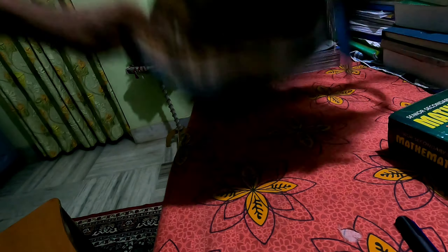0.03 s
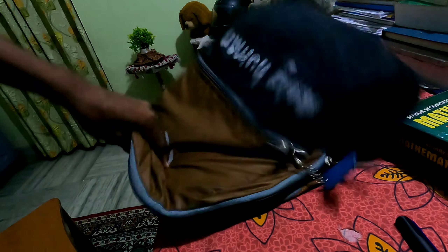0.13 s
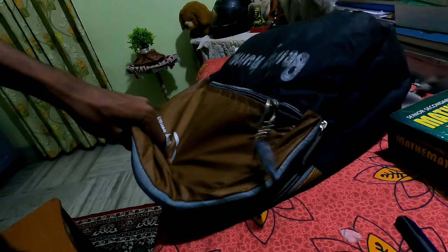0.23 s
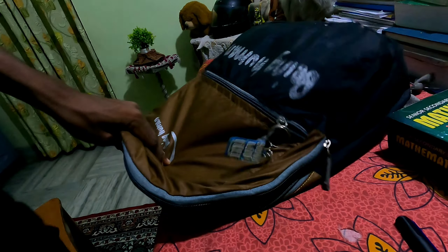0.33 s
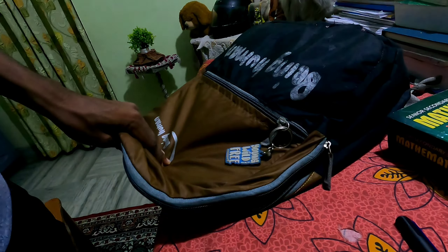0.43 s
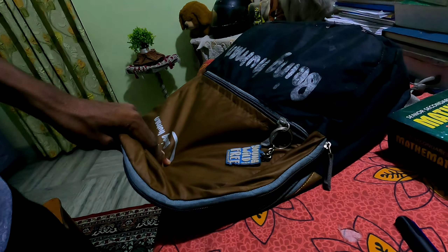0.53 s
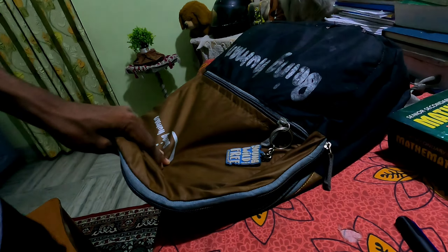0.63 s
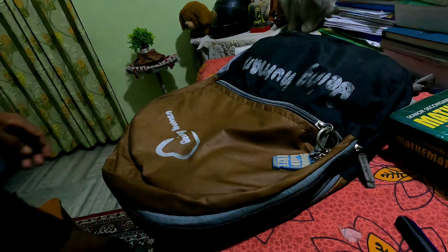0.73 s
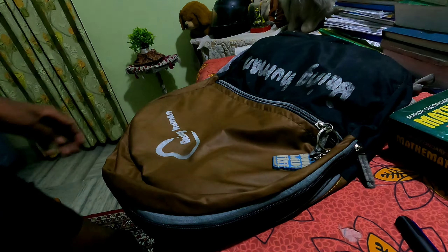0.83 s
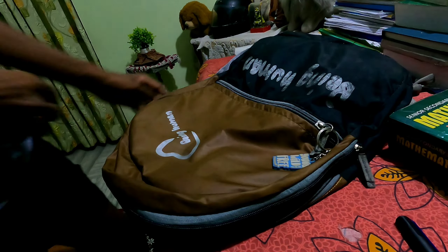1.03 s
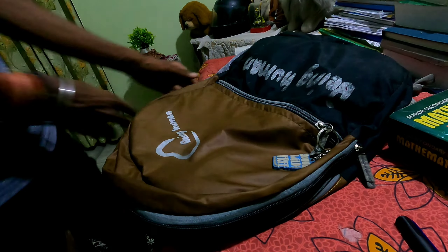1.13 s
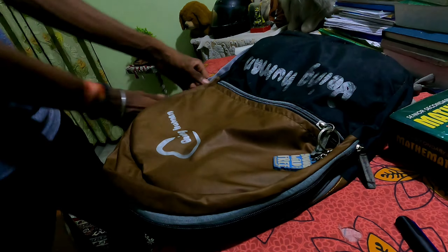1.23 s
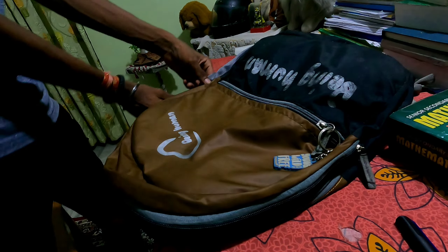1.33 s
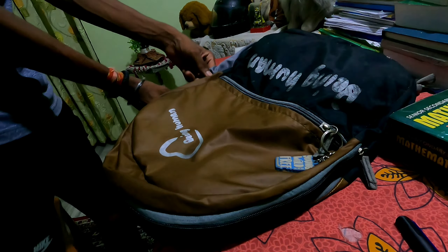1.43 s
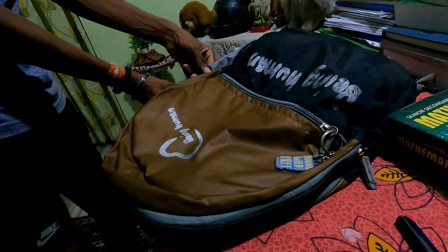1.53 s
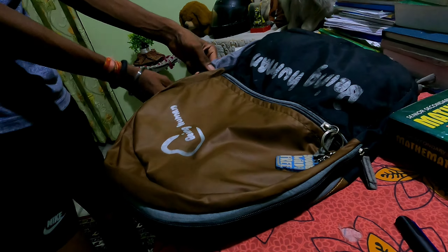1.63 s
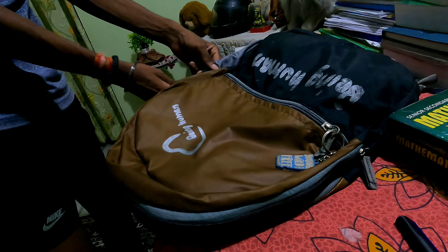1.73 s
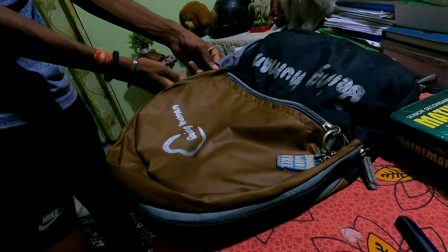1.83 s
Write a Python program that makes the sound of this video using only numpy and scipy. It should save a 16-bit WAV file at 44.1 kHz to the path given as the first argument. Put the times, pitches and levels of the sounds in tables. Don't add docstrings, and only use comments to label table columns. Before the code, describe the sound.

A packed backpack drops with a heavy soft thud on a bed, then hands rummage quietly

```python
import sys
import numpy as np
from scipy import signal
from scipy.fft import rfft, irfft
from scipy.io import wavfile

SR = 44100
rng = np.random.default_rng(int(sys.argv[2]) if len(sys.argv) > 2 else 0)


def level_to_linear(level):
    exponent = np.asarray(level, float) / 20
    return 10 ** exponent


def unload_wav(signal):
    wavfile.write(
        sys.argv[1],
        SR,
        np.round(np.clip(np.atleast_2d(signal).T, -1, 1) * 32767).astype(np.int16),
    )


N = 81585
TIME_S = np.arange(N) / SR


def in_time(rows):
    s, *columns = np.transpose(rows)
    return [np.interp(TIME_S, s, column) for column in columns]


def rms_one(x):
    return x / np.sqrt(np.mean(x ** 2) + 1e-20)


def drift(rate):
    pole = np.exp(-80 * np.pi * rate / SR)
    noise = rng.standard_normal(N // 40 + 2002)
    slow = signal.lfilter([1], [1, -2 * pole, pole * pole], noise)[2000:]
    return np.interp(np.arange(N) / 40, np.arange(len(slow)), rms_one(slow))


def band_pass(x, low_hz, high_hz):
    return signal.sosfilt(signal.butter(2, [low_hz, high_hz], "band", fs=SR, output="sos"), x)


def progress(start_s, length_s):
    return np.clip((TIME_S - start_s) / length_s, 0, 1)


def coloured(sources, spectrum, patchy_db):
    hz_points, db_points = np.transpose(spectrum)
    out, together = 0, drift(25)
    edges = 25 * 2 ** np.arange(0, 9.6, .5)
    for k, (low, high) in enumerate(zip(edges, edges[1:])):
        band = band_pass(sources[k % 2], low, high)
        log_centre = np.log(low * high) / 2
        level_db = np.interp(log_centre, np.log(hz_points), db_points, left=-60, right=-90)
        out = out + band * level_to_linear(level_db + patchy_db * (together + drift(12.0)))
    return rms_one(out)


def crumple(noise_share):
    grains_per_s, spread_db = 2700, 4.5
    sizes = level_to_linear(spread_db * np.minimum(rng.exponential(1, N), 5)) * rng.choice([-1, 1], N)
    grains = rms_one(sizes * (rng.random(N) < grains_per_s / SR))
    return grains + noise_share * rng.standard_normal((2, N))


# f/Hz, level per Hz/dB
HISS_SPECTRUM = [(710, -50), (1200, -2), (1580, -10), (1770, -20), (1890, -14.5), (6920, -7.5),
                 (11000, -18.5), (14300, -60), (22000, -120)]


def hiss():
    duck_s, recover_s, recover_length_s = .25, .78, 0.12
    held = (TIME_S > duck_s) * (1 - progress(recover_s, recover_length_s))
    level_db = -65.5 - 7 * held
    return level_to_linear(level_db) * coloured(rng.standard_normal((2, N)), HISS_SPECTRUM, patchy_db=-2.6)


# f/Hz, level per Hz/dB
ROOM_SPECTRUM = [(47, -18), (80, -3.5), (86, -2.5), (211, -7.5), (328, -29), (381, -21.5), (3000, -39),
                 (3900, -97), (6600, -120)]


def room():
    return level_to_linear(-52.5) * coloured(rng.standard_normal((2, N)), ROOM_SPECTRUM, patchy_db=-0.3)


# t/s, level/dB, low drag level/dB, crispness/dB
HANDS_BEFORE_CHANGE = [
    (0, -57, -48.5, 10),
    (.15, -53, -54, 7),
    (.2, -47, -47, 6.5),
    (.5, -56, -49, 8),
    (.6, -63.5, -55, -4.5),
    (.8, -59, -55, -23),
    (.9, -60, -51, 5),
    (1.0, -63.5, -56.5, 12.5),
]
# t/s, level/dB, low drag level/dB, crispness/dB
HANDS_AFTER_CHANGE = [(1.009, -53.5, -45, -26), (1.15, -51.5, -48, -22), (1.184, -52.5, -44, -1),
                      (1.25, -51.5, -49.5, -5), (1.3, -52, -42.5, 3.5), (1.35, -51.5, -52.5, 0),
                      (1.375, -50, -46.5, 0), (1.409, -48.5, -43, -0.5), (1.45, -56.5, -48.5, 4.5),
                      (1.498, -49, -45, -1), (1.57, -51.5, -51, -0.5), (1.63, -49.5, -50, -9),
                      (1.69, -54, -51, -6), (1.85, -55, -53, -12)]
# f/Hz, level per Hz/dB
CLOTH_SPECTRUM = [(290, -2), (500, -7), (565, -12), (923, -8.5), (1040, -1), (1130, -12), (1320, -9.5),
                  (6850, -29.5), (13000, -43)]
# f/Hz, level per Hz/dB
DRAG_SPECTRUM = [(15, -48), (25, -15), (184, 2), (243, -0.5), (316, -1), (467, -16.5), (530, -5),
                 (700, -14), (910, -47), (1540, -120)]


def hands():
    cloth_db, drag_db, crisp_db = in_time(list(HANDS_BEFORE_CHANGE) + list(HANDS_AFTER_CHANGE))
    crisp_hz = 4200
    x = coloured(crumple(2.1), CLOTH_SPECTRUM, patchy_db=0.42)
    dull = signal.lfilter(*signal.butter(2, crisp_hz, fs=SR), x)
    crisp = signal.lfilter(*signal.butter(2, crisp_hz, "high", fs=SR), x)
    cloth = level_to_linear(cloth_db) * (dull - level_to_linear(crisp_db) * crisp)
    drag = level_to_linear(drag_db) * coloured(rng.standard_normal((2, N)), DRAG_SPECTRUM, patchy_db=0.5)
    return cloth + drag


# t/s, length/s, level/dB, f/Hz
SPRING_SWAYS = [(.01, 0.15, -41, 53), (0.023, 0.098, -48.5, 98.5), (.03, 0.15, -50, 204.6),
                (0.106, 0.089, -44.5, 303.7), (.222, 0.057, -13, 115), (0.274, 0.073, -16, 94),
                (0.299, 0.079, -30.5, 265.7), (0.334, 0.22, -29.5, 53.2), (0.344, 0.0587, -37, 292.3),
                (0.378, 0.059, -30.5, 112.6), (0.566, 0.12, -39, 55.4), (0.759, 0.034, -41, 93),
                (1.09, 0.095, -47, 298.4)]


def sways():
    out = 0
    wander = np.cumsum(1 + 0.031 * drift(15.3)) / SR
    for s, length, db, hz in SPRING_SWAYS:
        swell = np.sin(np.pi * progress(s, length) ** 0.59)
        out = out + level_to_linear(db) * swell * np.sin(2 * np.pi * hz * (wander - wander[int(s * SR)]))
    return out


# t/s, level/dB
CLOTH_SLAP = [
    (0.19, -52.5),
    (0.204, -57.5),
    (0.236, -23.5),
    (0.248, -28),
    (0.316, -36.5),
    (0.336, -36.5),
    (0.486, -69.5),
    (0.512, -58.5),
    (0.56, -83),
]
# f/Hz, level per Hz/dB
SLAP_SPECTRUM = [(290, -44), (500, -5.5), (689, -4.5), (1330, -13), (5500, -29), (7170, -31), (14000, -43)]


def slap():
    before, after = (CLOTH_SLAP[0][0] - .02, -100), (CLOTH_SLAP[-1][0] + .03, -100)
    level_db, = in_time([before] + list(CLOTH_SLAP) + [after])
    lift_db = 3
    return level_to_linear(level_db + lift_db) * coloured(crumple(3.9), SLAP_SPECTRUM, patchy_db=1.14)


# t/s, ring level/dB, ring f/Hz, t60/s, snap level/dB
ZIP_TICKS = [(0.208, -34.5, 3440, 0.011, -55), (0.2343, -23, 2307, 0.026, -23),
             (0.237, -15, 4200, 0.008, -34.5), (.2625, -44, 2430, 0.03, -42), (.364, -53, 3700, 0.027, -41),
             (.374, -46, 3600, 0.018, -34), (0.5122, -42, 3580, 0.017, -41), (0.523, -42, 3010, 0.018, -58),
             (0.9166, -35.5, 620, 0.043, -66), (1.163, -46, 3530, 0.0065, -62),
             (1.2878, -37, 2940, 0.013, -46), (1.298, -45, 2900, 0.034, -50.5),
             (1.4856, -30, 2200, 0.013, -38), (1.49, -47, 7040, .015, -60), (1.509, -48, 9900, 0.014, -67),
             (1.519, -59, 9800, 0.06, -72), (1.532, -59, 9900, 0.05, -70), (1.7395, -38, 2250, 0.0092, -49),
             (1.739, -47, 5880, 0.013, -60), (1.754, -42.5, 2800, 0.029, -53),
             (1.771, -56, 2640, 0.033, -52)]


def ticks():
    rise_s, roughness, wobble_hz = 0.00073, 0.73, 900
    out, t = np.zeros(N + SR), np.arange(SR // 8) / SR
    for s, db, hz, t60, snap_db in ZIP_TICKS:
        puff = rms_one(band_pass(rng.standard_normal(len(t)), 784, 4680))
        wobble = np.cumsum(rng.standard_normal(len(t))) * roughness * np.sqrt(60 / t60 / SR)
        wobble = signal.lfilter(*signal.butter(2, wobble_hz, fs=SR), wobble)
        sound = level_to_linear(db) * np.sin(2 * np.pi * hz * t + wobble) + level_to_linear(snap_db) * puff
        envelope = level_to_linear(-60 * t / t60) * (1 - np.exp(-t / rise_s))
        start = int(s * SR)
        out[start:start + len(t)] += envelope * sound
    return out[:N]


def ring(clicks, hz, t60):
    r, w = level_to_linear(-60 / (t60 * SR)), 2 * np.pi * hz / SR
    return signal.lfilter([0, np.sin(w)], [1, -2 * r * np.cos(w), r * r], clicks + 1e-18)


# t/s, strength/dB, hardness f/Hz
BAG_CONTACTS = [(.2185, -20.5, 494), (.224, -19.5, 506), (.234, -14.5, 1500), (.245, -15, 390),
                (.258, -17.5, 890), (.266, -8, 970), (.285, -14.5, 740), (.302, -12.5, 393),
                (.33, -26.5, 490), (.345, -47, 388), (.363, -34, 910), (.39, -28, 304), (.408, -27.5, 280)]
# f/Hz, level/dB, t60/s
BODY_MODES = [(52.3, -17, 0.13), (106.3, -8, 0.17), (163.6, -13.5, 0.24), (219, -6, 0.088),
              (310, -3, 0.046), (396, -13, 0.064), (439, -12, 0.059), (496, -7.5, 0.058), (566, -20, 0.036),
              (844, -13, 0.05), (1098, 3, 0.016)]


def landing():
    spread_db = 7 * rng.standard_normal((len(BAG_CONTACTS), len(BODY_MODES)))
    push = np.zeros((len(BAG_CONTACTS), N))
    for k, (s, db, hz) in enumerate(BAG_CONTACTS):
        pulse = np.hanning(int(SR / hz) + 3)
        start, sign = int(s * SR), (-1) ** (k + 1)
        push[k, start:start + len(pulse)] = level_to_linear(db) * pulse / pulse.sum() * sign
    out = np.zeros(N)
    for m, (hz, db, t60) in enumerate(BODY_MODES):
        out += ring(level_to_linear(db + spread_db[:, m]) @ push, hz, t60)
    return out


# t/s, length/s, level/dB, f/Hz, width/octaves
CLOTH_RUBS = [(.225, 0.15, -57.5, 11100, 0.65), (.219, .008, -29.5, 1800, 1.5),
              (.2325, 0.013, -31.5, 4650, 0.7), (.256, 0.018, -33, 1800, 1.8), (.32, 0.11, -46, 2080, 1.07),
              (.41, 0.17, -47, 143, 0.81), (.508, 0.03, -53, 3450, 1.1), (.511, 0.012, -67, 8950, 1.0),
              (.914, 0.011, -46.5, 900, 0.86), (.862, 0.033, -59.5, 1030, 0.26),
              (1.06, 0.12, -49, 295, 0.26), (1.155, 0.075, -57, 2960, 0.73), (1.17, 0.044, -53, 1310, 0.43),
              (1.288, 0.036, -60, 3000, 1.17), (1.285, 0.037, -50, 1050, 0.48),
              (1.287, 0.008, -61, 8460, 0.89), (1.297, .012, -60, 8500, 0.73), (1.737, .008, -66, 8500, .6),
              (1.36, 0.07, -56.5, 3870, 1.5), (1.488, 0.047, -56.5, 3000, 2), (1.59, 0.096, -56.5, 2500, 1),
              (1.725, 0.047, -61.5, 2900, .7), (1.79, .02, -49, 780, .7)]


def rubs():
    out, grains = np.zeros(N), crumple(0.46)
    for k, (s, length, db, hz, octaves) in enumerate(CLOTH_RUBS):
        half = 2 ** (np.clip(octaves, .1, 2.5) / 2)
        band = band_pass(grains[k % 2], hz / half, hz * half)
        swell = np.abs(np.sin(np.pi * progress(s, length) ** 0.78)) ** 1.6
        out += level_to_linear(db) * swell * rms_one(band)
    return out


# t/s, peak level/dB, f/Hz (negative starts with a pull), t60/s
LOW_BUMPS = [(.2197, -12.5, -300, 0.058), (0.2238, -14, 295.5, 0.0444), (0.7335, -17, -44, 0.086),
             (0.747, -29, 43, 0.43), (0.847, -21.5, 9, 0.21), (0.902, -26.5, 56, 0.081),
             (0.917, -19, 151, 0.023), (.921, -13, -39, 0.041), (0.931, -30.5, 169, 0.063),
             (0.952, -28, 60, 0.084), (1.09, -57, 89, 0.11), (1.18, -46, 51.5, 0.57),
             (1.322, -42, 44.5, 0.72), (1.569, -51, 106.5, 0.34), (1.244, -33.5, 52.5, 0.17),
             (1.374, -35.5, 175, 0.1), (1.409, -31.5, 107.5, 0.19), (1.423, -26, 109, 0.18)]


def bumps():
    out, rise_cycles = 0, 0.1
    for s, db, hz, t60 in LOW_BUMPS:
        t = np.maximum(TIME_S - s, 0)
        rise = 1 - np.exp(-t * abs(hz) / rise_cycles)
        out = out + level_to_linear(db - 60 * t / t60) * rise * np.sin(2 * np.pi * hz * t)
    return out


def flick():
    start_s, length_s, level_db = .7245, 0.0088, -36
    end_hz, fall_hz, fall_s, roughness = 640, 3610, 0.00208, .2
    peaking, noise_share = 0.26, 0.14
    t = np.maximum(TIME_S - start_s, 0)
    pitch = (end_hz + fall_hz * np.exp(-t / fall_s)) * (1 + roughness * drift(390))
    phase = 2 * np.pi * np.cumsum(pitch * (t > 0)) / SR
    slips = np.sin(phase) - peaking * np.cos(2 * phase) + peaking ** 2 * np.sin(3 * phase) / 2
    grit = signal.lfilter(*signal.butter(2, 4680, fs=SR), rng.standard_normal(N))
    x = progress(start_s, length_s)
    return level_to_linear(level_db) * (np.sin(np.pi * x ** 2.03) * slips + noise_share * np.sin(np.pi * x) * grit)


def creak():
    start_s, length_s, centre_hz, level_db = 1.18, .19, 558, -51
    x = progress(start_s, length_s)
    pitch = centre_hz * (1 + .04 * np.sin(np.pi * x) + .004 * drift(30))
    swell = np.sin(np.pi * x ** .6) * level_to_linear(level_db + 1.5 * drift(20))
    return swell * np.sin(2 * np.pi * np.cumsum(pitch) / SR)


def scene():
    background = hiss() + room()
    fabric = hands() + slap() + rubs() + flick() + creak()
    bag_and_bed = sways() + ticks() + landing() + bumps()
    return (background + fabric + bag_and_bed)[None]


def low_pass(x):
    return signal.sosfilt(signal.butter(12, 15210, fs=SR, output="sos"), x)


# f/Hz, level/dB
MICROPHONE_RESPONSE = [(5200, 0), (6800, 1.5), (7400, 0.5), (7800, -5.5), (11000, -9.5), (15000, -34)]


def record(dry):
    hz, db = np.transpose(MICROPHONE_RESPONSE)
    bins_hz = np.arange(N // 2 + 1) * SR / N
    response = level_to_linear(np.interp(np.log(bins_hz + 1), np.log(hz), db))
    x = irfft(rfft(dry) * response, N)
    limit = .46
    limited = limit * np.tanh(x / limit)
    change_s, cut_s, fade_start_s, fade_s = 1.0055, .002, 1.012, 0.082
    fade_out = np.minimum((change_s - TIME_S) / cut_s, 1)
    fade_in = np.clip((TIME_S - fade_start_s) / fade_s, .005, 1) ** 1.8
    return low_pass(limited * np.where(TIME_S < change_s, fade_out, fade_in))


dry = scene()
out = record(dry)
unload_wav(out)
```